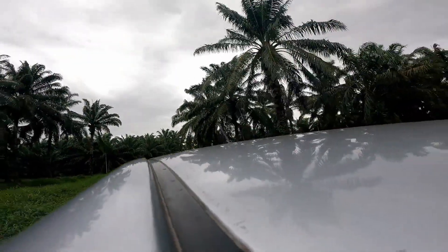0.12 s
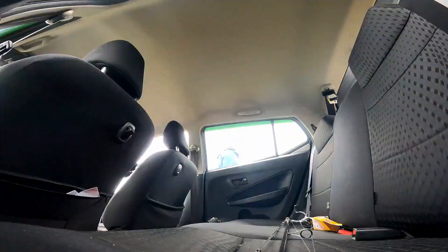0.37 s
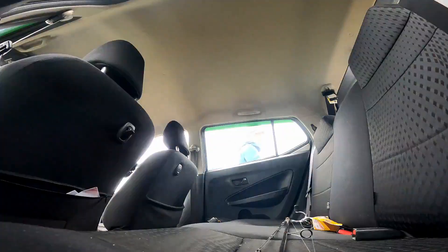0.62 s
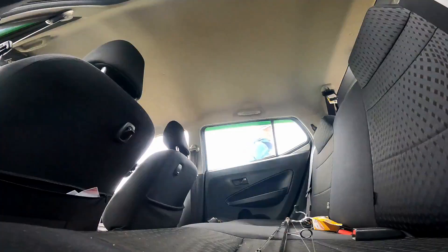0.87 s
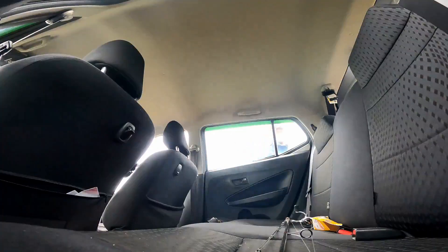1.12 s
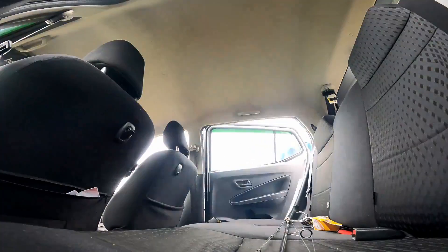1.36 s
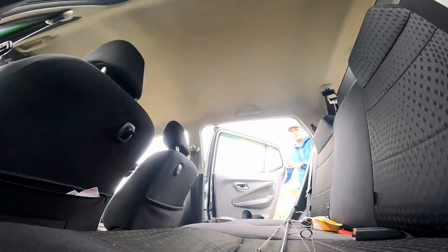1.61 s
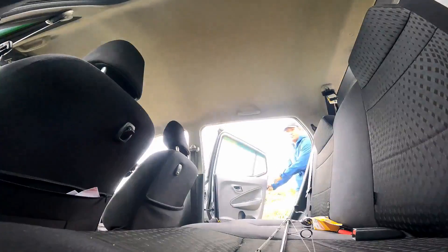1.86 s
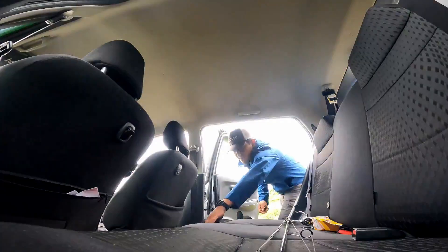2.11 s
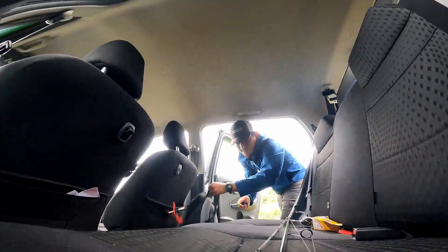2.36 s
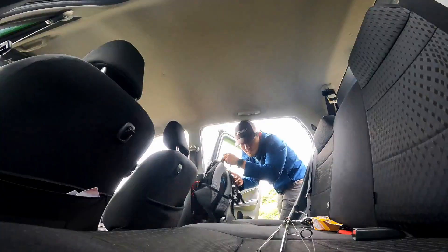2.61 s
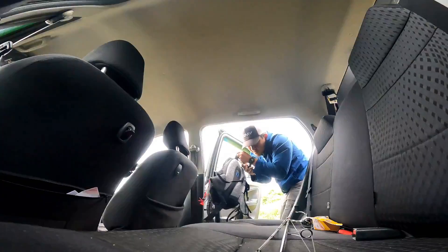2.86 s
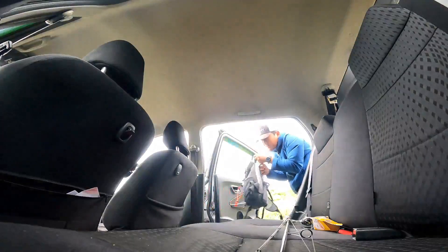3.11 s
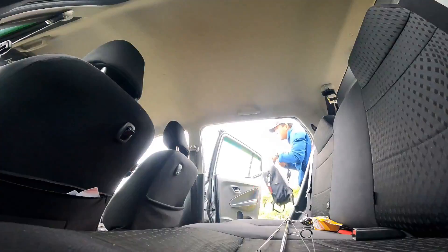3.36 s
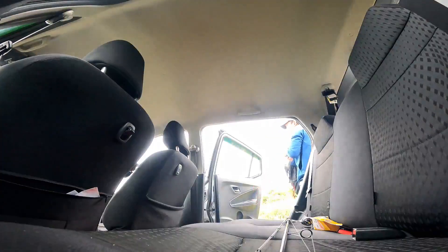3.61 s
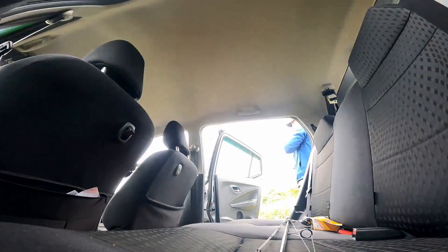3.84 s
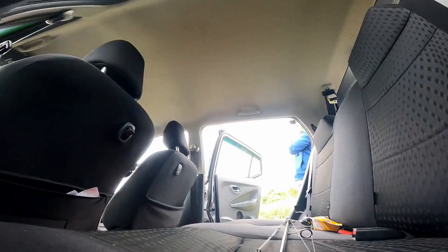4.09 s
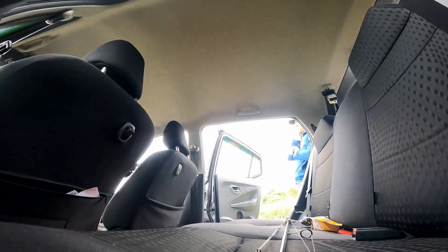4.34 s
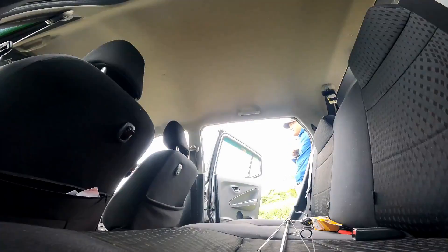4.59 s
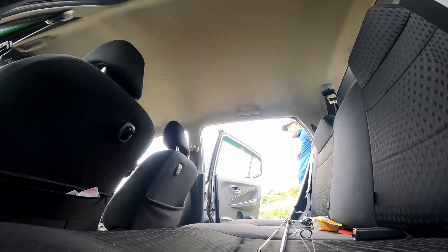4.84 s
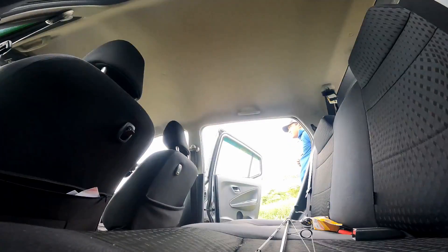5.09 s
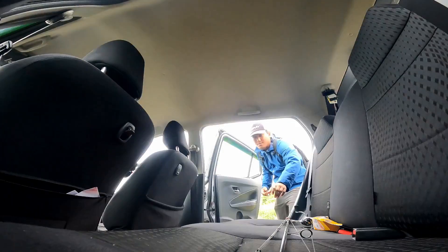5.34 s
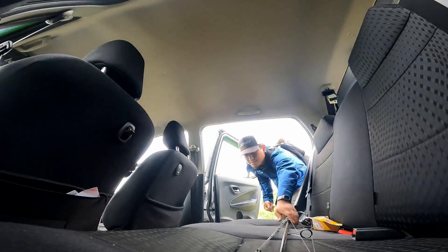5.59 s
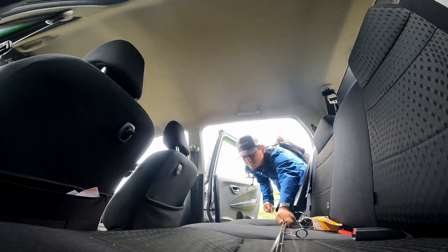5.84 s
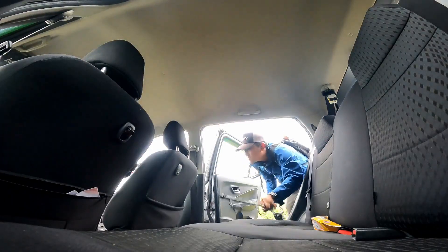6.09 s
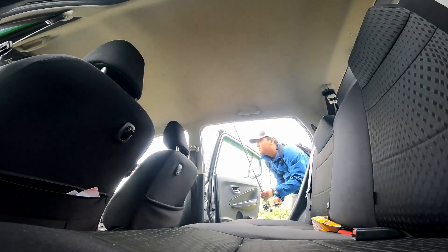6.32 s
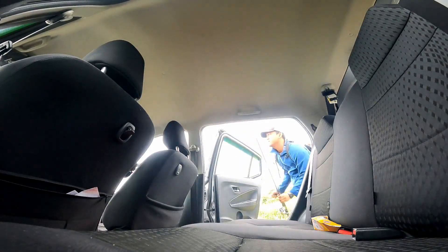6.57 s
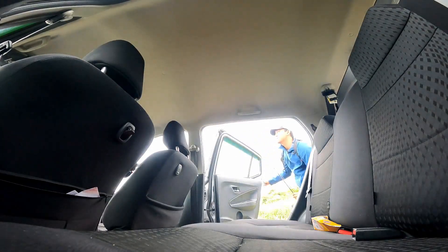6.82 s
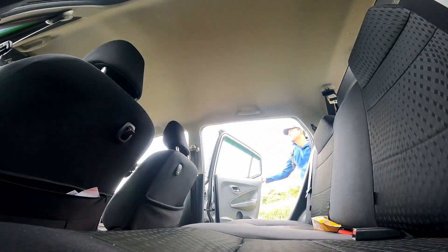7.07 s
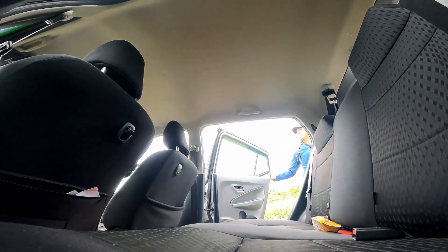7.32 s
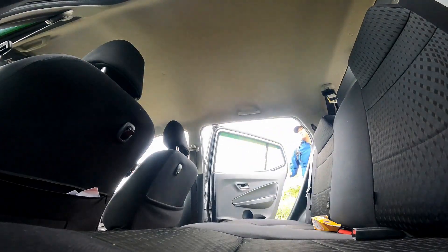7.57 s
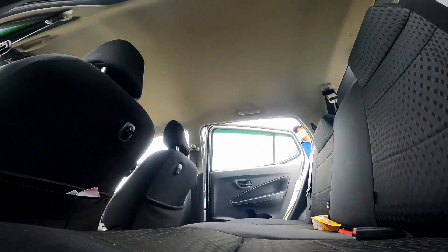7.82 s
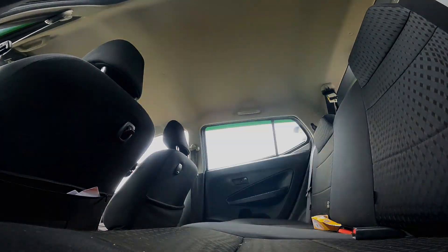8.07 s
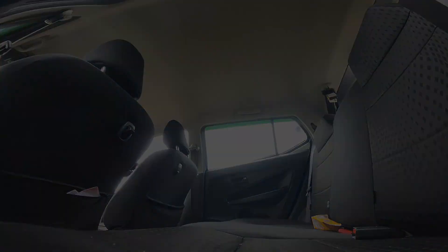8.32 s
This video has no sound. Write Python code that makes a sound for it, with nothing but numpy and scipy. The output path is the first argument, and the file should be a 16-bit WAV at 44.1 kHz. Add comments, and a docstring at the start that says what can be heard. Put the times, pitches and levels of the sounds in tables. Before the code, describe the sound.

Low wind on a microphone outdoors, then a click and the close, dry cabin of a parked car. Latch clunk and deep body thud, the panels drumming; bumps and fabric swishes as a bag comes out; softer rustling, tiny metallic jingles and buckle scrapes; sharp ticks of a fishing rod; faint high insect whine; finally a heavy door slam close to the end.

```python
"""Wind buffets a microphone on a car roof; after a cut it lies on the back seat.
The door is unlatched and swung open, a backpack is dragged out and shouldered with jingling zip pulls,
a rod is drawn out ticking on the trim and the door is slammed. Insects buzz outside.
Knocks are noise bursts that ring the car body, bumps and zip pulls are dying tones,
and wind, cloth, drumming panels and insects are shaped noise."""
import sys
import numpy as np
from scipy import signal
from scipy.fft import rfft, irfft, next_fast_len
from scipy.io import wavfile

SR = 44100
rng = np.random.default_rng(int(sys.argv[2]) if len(sys.argv) > 2 else 0)


def ratio(d):
    """dB to gain"""
    e = np.asarray(d, float) / 20
    return 10 ** e


def waveform_to_disk(signal):
    """Save audio, clipped to [-1, 1], as 16-bit WAV at the path in sys.argv[1]."""
    frames = np.transpose(np.atleast_2d(signal))
    scaled = np.clip(frames, -1, 1) * 32767
    samples = np.round(scaled).astype(np.int16)
    wavfile.write(sys.argv[1], SR, samples)


N = 372282   # length in samples
CUT_S = .3542   # roof before, back seat after
SEAT_HZ, SEAT_T60_S = 78, 0.18   # the cushion under the microphone


def in_time(rows):
    """Joins the points of each column by straight lines, one value a sample."""
    s, *columns = np.transpose(rows)
    return [np.interp(np.arange(N) / SR, s, c) for c in columns]


def at_hz(points, hz):
    """Reads a spectrum on a log frequency axis."""
    return np.interp(np.log(hz), np.log(np.array(points)[:, 0]), np.array(points)[:, 1])


def rms_one(x):
    """Scales a sound to rms 1."""
    return x / np.sqrt(np.mean(x ** 2) + 1e-20)


def drift(rate):
    """Slow random wandering of rms 1; a higher rate wanders faster."""
    r = np.exp(-80 * np.pi * rate / SR)
    noise = rng.standard_normal(N // 40 + 2002)
    slow = signal.lfilter([1], [1, -2 * r, r * r], noise)[2000:]
    # one slow value every 40 samples
    return np.interp(np.arange(N) / 40, np.arange(len(slow)), rms_one(slow))


def band(x, low_hz, high_hz):
    """Keeps the part of a sound between two frequencies."""
    sos = signal.butter(2, [low_hz, min(high_hz, .45 * SR)], "band", fs=SR, output="sos")
    return signal.sosfilt(sos, x + 1e-18)


def ring(clicks, hz, t60):
    """A resonance: a unit click sets a sine of height 1 ringing, 60 dB down after t60 seconds."""
    r, w = ratio(-60 / (t60 * SR)), 2 * np.pi * hz / SR
    return signal.lfilter([0, np.sin(w)], [1, -2 * r * np.cos(w), r * r], clicks + 1e-18)


# how alike left and right are: f/Hz, likeness (0 to 1)
LIKENESS = [(60, 1), (180, 0.95), (550, 0.73), (1650, 0.49), (4970, 0.79), (15000, 0.68)]


def texture(spectrum, patchy_db, grain_db, length=N):
    """Stereo noise of uneven grains, coloured by a spectrum, with a shared flicker; rms 1."""
    hz = np.maximum(np.arange(length // 2 + 1) * SR / length, 1)
    alike = np.clip(at_hz(LIKENESS, hz), 0, .99)
    grains = rng.standard_normal((2, length)) * ratio(grain_db * rng.exponential(1, length))
    mid, side = rfft(grains) * ratio(at_hz(spectrum, hz))
    pair = irfft(np.sqrt(1 + alike) * mid + np.sqrt(1 - alike) * side * [[1], [-1]], length)
    flicker_db = patchy_db * (drift(7.3) + drift(22.0))
    return rms_one(pair * ratio(flicker_db)[:length])


def bursts(times, levels_db, t60s, rise_s, snap):
    """Noise that rises fast and dies away, with one snap 2 ms in; one row of sound per column of levels."""
    t = np.arange(SR // 4) / SR
    out = np.zeros((np.shape(levels_db)[1], N + len(t)))
    for s, row_db, t60 in zip(times, levels_db, t60s):
        start = round(s * SR)
        shape = (1 - np.exp(-t / rise_s)) * ratio(-60 * t / max(t60, .005))
        click = np.arange(len(t)) == SR // 500
        contact = shape * rng.standard_normal(len(t)) + snap * click
        out[:, start:start + len(t)] += ratio(row_db)[:, None] * contact
    return out[:, :N]


def swells(rows, extra_db, slower, rest_db):
    """Level in dB: each row rises to its peak and falls away, powers added over a resting level."""
    t = np.arange(0, N, 40) / SR
    s, db, rise, fall = np.array(rows)[:, :4].T[:, :, None]
    late = (t - s) / slower   # scales both rise and fall: above 1 lengthens, below 1 shortens
    before, after = -late / np.maximum(rise, .01), late / np.maximum(fall, .01)
    fade_db = 20 * np.where(late < 0, before, after)
    power = np.sum(ratio(db + np.reshape(extra_db, (-1, 1)) - fade_db) ** 2, axis=0)
    return 10 * np.log10(np.interp(np.arange(N) / SR, t, power) + ratio(rest_db) ** 2)


# knocks of latch, door, bag and rod: t/s, strength level/dB, added weight level/dB,
# added hardness level/dB, contact t60/s
KNOCKS = [(0.584, -47, 4.5, -3.5, 0.085), (0.84, -23.5, -2, -19.5, 0.22), (1.272, -24.5, 1.5, -5.5, 0.32),
          (1.293, -11.5, -2, -15, 0.17), (1.322, -16.5, -8, -9, 0.11), (1.364, -25.5, -2.5, -1.5, 0.061),
          (1.387, -29, -2, -4, 0.11), (1.436, -40.5, 10.5, -4, 0.12), (1.587, -28.5, 0.5, -8.5, 0.18),
          (1.788, -46, 19, -11.5, 0.22), (2.223, -36, 12, -1.5, 0.038), (2.287, -29, 17, -15, 0.02),
          (2.337, -34, -8, -4.5, 0.91), (2.44, -14.5, -4, -8.5, 0.11), (2.501, -24.5, -16, -6, 0.085),
          (2.538, -22.5, -5, -7.5, 0.096), (2.631, -18.5, -4.5, 1, 0.041), (2.704, -30.5, -13, -4, 0.13),
          (2.764, -30.5, -30, 4.5, 0.12), (2.81, -16, -8.5, -5, 0.067), (3.053, -33, -13, -4, 0.087),
          (3.715, -27.5, -33, -4.5, 0.075), (3.754, -31.5, -27, 5.5, 0.069), (4.511, -41, -7, -2, 0.066),
          (4.634, -36.5, -2, -3, 0.29), (5.554, -33, -9, -4.5, 0.13), (5.753, -36.5, 7, -9, 0.33),
          (5.84, -28, -20, -5.5, 0.054), (5.874, -25, -16.5, -6, 0.044), (6.05, -33, -1, -16, 0.1),
          (7.066, -34.5, -7.5, 4.5, 0.16), (7.1, -32.5, -12, 5, 0.14), (7.534, -36.5, 2.5, 5, 0.094),
          (8.217, -9, -11, -8, 0.072), (8.234, -8, -1, -3.5, 0.16), (8.278, -14.5, 3, -9.5, 0.15),
          (8.318, -22.5, -5, -10.5, 0.31)]
# resonances of the car body: f/Hz, relative level/dB, t60/s
CAR_BODY = [(147.2, 2.5, 0.23), (231.9, -5, 0.28), (292.7, -5.5, 0.24), (350, 6, 0.039), (516, 10, 0.017),
            (625, 3.5, 0.019), (1014, 1, 0.026), (1367, -6.5, 0.097)]
# gear is handled on the seat between these two times: t/s
GEAR_S = (2.0, 7.0)


def knocks():
    """A rattling contact shakes the car body; the slow-building boom also rings the seat under moved gear."""
    s, db, weight_db, hard_db, t60s = np.transpose(KNOCKS)
    t = np.arange(N) / SR
    # columns: thud, boom, body, crack
    levels_db = db[:, None] + np.transpose([0 * db, weight_db, hard_db, hard_db - 1.5])
    rise_s = np.array([[.003], [.006], [.004], [.004]])
    snap = np.array([[9.0], [18.0], [6.0], [1.2]])
    thud, boom, body, crack = bursts(s, levels_db, t60s, rise_s, snap)
    on_seat = (t > GEAR_S[0]) & (t < GEAR_S[1])
    boom = 4.03 * band(boom, 83.0, 229)
    # the door side is a little louder
    thud = band(band(thud, 300, 1030), 202, 1210) * ratio([[1.5], [-1.5]])
    shake = boom * np.where(on_seat, .4, 1) + 2.14 * thud + 2.18 * band(body, 1150, 2165)
    modes = sum(ratio(mode_db) * ring(shake, hz, t60) for hz, mode_db, t60 in CAR_BODY)
    modes += ratio(9.5) * ring(boom * on_seat, SEAT_HZ, SEAT_T60_S)
    dull_crack = signal.lfilter([.4], [1, -.6], band(crack, 1550, 5080))
    return shake + ratio(-42.5) * modes + dull_crack


# hollow bumps and pings of door panel, bag, rod and trim:
# t/s, level/dB (before a 5 dB lift), f/Hz, t60/s
BUMPS = [(.874, -21.5, 143.8, .2), (.92, -22, 145, 0.24), (1.299, -33.5, 2640, 0.03),
         (1.353, -12, 104.6, 0.19), (1.595, -18, 145.6, 0.13), (1.992, -44.5, 3430, 0.012),
         (2.134, -42.5, 1850, 0.015), (2.417, -21, 435, 0.034), (2.465, -17.5, 450, 0.027),
         (2.655, -29, 85.2, 0.32), (2.826, -25, 432, 0.078), (3.096, -34, 280, 0.054),
         (3.7535, -24.5, 1220, 0.018), (3.761, -32.5, 477, 0.042), (4.445, -37.5, 453, 0.031),
         (4.508, -27, 233, 0.039), (5.014, -44, 520, 0.082), (5.682, -38.5, 1500, .02),
         (5.786, -34.5, 1250, 0.021), (5.807, -34.5, 1330, 0.022), (5.888, -30.5, 1240, 0.017),
         (5.955, -37, 330, 0.071), (6.014, -38.5, 340, 0.12), (7.174, -35.5, 276, 0.089),
         (7.705, -24.5, 195, 0.063), (7.729, -26, 197, 0.073), (8.218, -15.5, 642, 0.076),
         (8.268, -19, 127, .12), (8.316, -16, 350, 0.048)]


def bumps():
    """A soft contact rings one hollow mode and a weaker neighbour at a random pitch below it."""
    out = np.zeros(N + SR)
    t = np.arange(SR // 2) / SR
    for (s, db, hz, t60), (below, turn) in zip(BUMPS, rng.random((len(BUMPS), 2))):
        start = round(s * SR)
        neighbour_hz = hz * (0.44 + 0.355 * below)
        tone = np.sin(2 * np.pi * hz * t) + 0.42 * np.sin(2 * np.pi * (neighbour_hz * t + turn))
        build = 1 - np.exp(-t * hz * 2.07)   # nearly full after two cycles
        out[start:start + len(t)] += tone * build * ratio(db + 5.0 - 60 * t / max(t60, .01))
    return out[:N]


# the car is leant on and moved: t/s at the peak, drumming level/dB, rise/s and fall/s over 20 dB
# (lengthened for rocking, shortened for drumming), rocking level/dB above drumming
LEANS = [(.91, -31.5, 0.22, 0.36, 0), (1.33, -12, 0.08, 0.0663, -4.5), (1.65, -36, 0.65, 0.44, 4.5),
         (2.289, -28, 0.13, 0.32, -2.5), (2.55, -25.5, 0.49, .5, -5), (3.3, -45.5, 1.9, 2.2, -2),
         (4.45, -48, 0.7, 1, 5), (5.0, -47, 0.55, 1.6, -13), (5.83, -36, 0.23, 0.84, -4.5),
         (6.83, -51.5, 1, .02, 9.5), (7.24, -44.5, 0.5, 6, 2), (7.76, -36, 0.22, 0.5, -0.5)]


def car_levels():
    """Rocking and drumming dB; the whole body answers more slowly than its panels."""
    rest_db = -59
    rocking_db = swells(LEANS, np.array(LEANS)[:, 4], 1.17, rest_db)
    drumming_db = swells(LEANS, 0, 0.77, rest_db)
    return rocking_db, drumming_db


# strokes of cloth and door seal: t/s at the peak, swish level/dB, rise/s and fall/s over 20 dB
# (both slightly shortened when played; below .01 counts as .01), drag level/dB above swish
STROKES = [(.85, -72.5, 0.05, -0.27, 28.5), (1.312, -34.5, 0.02, -0.04, -3.5),
           (1.601, -54, 0.3, -0.02, 0.5), (2.028, -55.5, 0.37, 4, -9), (2.371, -42.5, 0.11, .5, 1.5),
           (2.456, -39.5, 0.15, 0.43, 6), (3.06, -49, 0.43, 0.52, -2), (3.276, -54.5, 0, 0.1, -3),
           (3.53, -49, 0.2, 0, 0.5), (3.98, -47.5, 0.5, 0.25, -1.5), (4.3, -55.5, 3.7, 0.65, 7.5),
           (4.47, -53.5, -0.5, -0.38, 3.5), (4.658, -49, -0.13, 0.2, -3), (5.0, -52, 1.9, 0.1, -1),
           (5.36, -58, -0.07, 3.5, 0.5), (5.6, -49.5, 0.3, 0.77, -5.5), (5.86, -57, 0.6, 0.4, 8),
           (6.43, -59, -0.2, 1, 5.5), (6.7, -51, 0.5, 0.25, -8.5), (7.06, -55, 1.3, 0, -14),
           (7.55, -59.5, 1.7, 0.8, 1), (8.216, -58.5, 0.03, -0.2, 19)]
# the door is open between these two times: t/s
DOOR_OPEN_S = (1.3, 8.22)


def cloth_levels():
    """Drag and swish dB; a faint rustle stays between strokes, nearly the same with the door open or shut."""
    t = np.arange(N) / SR
    is_open = (t > DOOR_OPEN_S[0]) & (t < DOOR_OPEN_S[1])
    rest_db = np.where(is_open, -70, -70.5)
    drag_db = swells(STROKES, np.array(STROKES)[:, 4], 0.85, rest_db)
    swish_db = swells(STROKES, 0, 0.93, rest_db)
    return drag_db, swish_db


# noise colours of the rocking body, drumming panels, dragged cloth, swish and hiss:
# f/Hz, relative level/dB (per Hz)
ROCKING = [(15, -12), (40, 5), (86, -30), (100, -19.5), (130, -46), (220, -120)]
DRUMMING = [(32, -7.5), (55, 3.5), (86, 7), (189, 0), (437, -13.5), (565, -21), (618, -52), (800, -61),
            (1040, -103)]
DRAG = [(410, -15.5), (700, -28.5), (1070, -9.5), (1320, -11), (1800, -11.5), (2300, -18.5), (2990, -19),
        (5060, -120)]
SWISH = [(1180, -31.5), (2000, -7.5), (2220, -15.5), (3280, -6.5), (5500, -11), (7150, -16.5),
         (12100, -120)]
HISS = [(2940, -7.5), (5000, -13), (7270, 2), (8620, -5), (12000, -10.5), (15500, -26.5)]


def handling():
    """The body rocks, seat and panels drum, cloth drags, swishes and hisses: five coloured noises."""
    rocking_db, drumming_db = car_levels()
    drag_db, swish_db = cloth_levels()
    low = ratio(rocking_db) * texture(ROCKING, patchy_db=1.2, grain_db=0)
    drum = texture(DRUMMING, patchy_db=1.4, grain_db=2.0)
    seat = ratio(-53.0) * ring(drum, SEAT_HZ, SEAT_T60_S)
    low += ratio(drumming_db) * rms_one(drum + seat)
    cloth = ratio(drag_db) * texture(DRAG, patchy_db=2.4, grain_db=3.0)
    cloth += ratio(swish_db) * texture(SWISH, patchy_db=1.9, grain_db=2.5)
    hiss = ratio(swish_db - 9.0) * texture(HISS, patchy_db=2.0, grain_db=2.0)
    return low + cloth + hiss


# ticks of buckles and rod rings: t/s, level/dB (before filtering), f/Hz, t60/s
TICKS = [(.803, -39, 3060, 0.073), (0.889, -43, 5730, 0.056), (3.601, -30.5, 3820, 0.15),
         (3.8999, -30, 3100, 0.027), (4.737, -31, 9100, 0.046), (4.9116, -40, 6600, 0.08),
         (4.972, -31, 7640, 0.02), (5.966, -16.5, 2300, 0.042), (6.0655, -33, 2860, 0.039),
         (6.167, -28, 2060, 0.035), (6.238, -34.5, 5500, 0.02), (6.302, -28.5, 3600, 0.071),
         (7.534, -24.5, 3520, 0.03)]


def ticks():
    """Short bright bursts, broad, with a hump at their own pitch; the two sides differ a little."""
    out = np.zeros((2, N + SR))
    t = np.arange(SR // 10) / SR
    for s, db, hz, t60 in TICKS:
        start = round(s * SR)
        mid, side = rng.standard_normal((2, len(t)))
        shape = (1 - np.exp(-t / 0.0026)) * ratio(db - 60 * t / max(t60, .004))
        burst = (mid + 0.29 * side * [[1], [-1]]) * shape
        broad = 0.61 * band(burst, 1900, max(7100, 2 * hz))
        hump = 0.9 * band(burst, hz / 1.15, hz * 1.12)
        out[:, start:start + len(t)] += broad + hump
    return out[:, :N]


# touches of the zip pulls: t/s, relative level/dB, added level/dB of the modes above 10 kHz
JINGLE = [(3.5558, -39, -41), (3.5833, -41, -23), (3.6184, -40.5, -8), (3.6406, -34, -21),
          (3.6571, -35, -20), (3.69, -34, -28), (3.7204, -34.5, -33), (4.2812, -43, -29),
          (4.5313, -36.5, -27), (4.579, -40, -25), (4.5924, -44, -13), (4.672, -33, -24),
          (4.7187, -34.5, -31), (4.8025, -35.5, -25), (4.8284, -42, -36), (4.977, -38, -26),
          (5.0205, -35, -28), (5.2335, -43, -17)]
# modes of a zip pull: f/Hz, relative level/dB, t60/s
ZIP_PULL = [(5750, -12, .03), (6900, -1, .04), (7060, 1, .035), (7330, -2, .04), (7850, 0, .03),
            (9230, -12, .1), (11100, -12, .03), (13300, 10, .07), (15350, 7, .06)]


def jingle():
    """Each touch and its two bounces are a short chatter that strikes every mode with random strength."""
    s, db, high_db = np.repeat(JINGLE, 3, axis=0).T
    bounce = np.arange(len(s)) % 3
    out = np.zeros(N)
    s = s + bounce * .012 * rng.uniform(0.47, 1.3, len(s))   # uneven gaps
    chance_db = rng.normal(0, 4.5, (len(s), len(ZIP_PULL)))
    touch_db = db - 5.0 * bounce   # each bounce is 5 dB weaker
    is_high = np.array(ZIP_PULL)[:, 0] > 1e4
    levels_db = touch_db[:, None] + is_high * high_db[:, None] + chance_db
    chatter = bursts(s, levels_db, np.full(len(s), .02), rise_s=0.002, snap=0)
    for touch, (hz, mode_db, t60) in zip(chatter, ZIP_PULL):
        out += ratio(mode_db - 23.5) * ring(touch, hz, t60)
    return out + 0.34 * band(chatter[1], 5500, 10000)


# straps sliding through buckles: t/s at the peak, level/dB, rise/s and fall/s over 20 dB
# (both very slightly shortened when played; below .01 counts as .01), resonance f/Hz
STRAPS = [(4.0, -40.5, 0.18, 0.15, 2950), (4.12, -39.5, -0.33, -0.1, 1780),
          (4.381, -48.5, -0.14, -0.05, 1100)]


def straps():
    """Friction noise through one resonance a strap."""
    out = np.zeros(N)
    for row in STRAPS:
        level_db = swells([row], 0, 0.97, rest_db=-120)
        friction = band(rng.standard_normal(N), row[4] / 1.29, row[4] * 1.19)
        out += ratio(level_db) * rms_one(friction)
    return out


def rattle(level_db, per_s):
    """Buckles and rod rings touch at random; each touch rings a few cycles at one of eight pitches."""
    is_touch = rng.random(N) < per_s / SR
    sizes = ratio(2.0 * np.minimum(rng.exponential(1, N), 2)) * rng.choice([-1, 1], N) * is_touch
    pitches, dealt = np.geomspace(450, 2200, num=8), rng.integers(0, 8, N)
    rings = sum(ring(sizes * (dealt == k), hz, 26.0 / hz) for k, hz in enumerate(pitches))
    return ratio(level_db) * rms_one(rings)


# pushes on the cabin air as the door moves: t/s, level/dB, direction (+1 or -1)
PUSHES = [(1.271, -14, -1), (8.228, -14, -1), (8.249, -5, 1)]


def cabin_air():
    """The closed cabin is an air spring that rings very low."""
    clicks = np.zeros(N)
    for s, db, direction in PUSHES:
        clicks[round(s * SR)] = ratio(db) * np.sign(direction)
    return ring(clicks, hz=22.45, t60=1)


def cabin(x):
    """Echoes in the cabin: short feedback delays, other ones for each side."""
    t60_s = 0.091
    size = next_fast_len(N + SR)
    turn = np.exp(-2j * np.pi * np.arange(size // 2 + 1) / size)   # one sample of delay
    lags = (rng.uniform(0.0017, 0.016, (2, 6)) * SR).astype(int)
    echo = []
    for side in lags:
        loops = [(-1) ** k * turn ** d / (1 - ratio(-60 * d / SR / t60_s) * turn ** d)
                 for k, d in enumerate(side)]
        echo.append(sum(loops))
    return irfft(rfft(x, size) * echo, size)[:, :N] / np.sqrt(6)


# wind on the microphone: t/s, level/dB
GUST = [(0.0, -20.5), (.25, -21), (.35, -15)]
# colour of the wind: f/Hz, relative level/dB (per Hz)
WIND = [(12, -56.5), (20, 1), (58, -3), (211, -17.5), (242, -25.5), (1330, -35), (1840, -45.5),
        (8790, -67.5), (11200, -84.5)]
# short bright flaps in the wind: t/s, level/dB (before filtering)
FLAPS = [(.1545, -16.5), (.309, -15), (.321, -28)]


def wind():
    """Lumpy turbulence with a few flaps, the same in both channels, until the cut."""
    length = round(CUT_S * SR)
    s, db = np.transpose(FLAPS)
    flaps = bursts(s, db[:, None], np.full(len(s), .06), rise_s=0.00076, snap=6.4)[0]
    out = band(band(flaps, 450, 1450), 300, 2000)
    turbulence = texture(WIND, patchy_db=2.0, grain_db=2.0, length=length)[0]
    out[:length] += ratio(in_time(GUST)[0][:length]) * turbulence
    # the signal slides to a steady offset in the last few ms, so the cut clicks
    slide = np.exp(np.minimum(np.arange(N) - length, 0) / (.003 * SR))
    return (out * (1 - slide) + ratio(-14) * slide) * (np.arange(N) < length)


# loudness of the insects: t/s, level/dB (before a 9 dB drop)
INSECTS = [(.37, -66), (1.6, -69), (2.5, -63), (4.5, -55), (7.1, -57.5), (8.15, -62.5)]
# the two singers: f/Hz, half width f/Hz, relative level/dB
INSECT_SONG = [(6960, 130, 0.0), (7270, 90, -1.0)]


def insects():
    """Two singers: narrow noise that swells and fades unevenly."""
    song = np.zeros((2, N))
    for hz, half_width, db in INSECT_SONG:
        swell = ratio(db + 3 * drift(14))
        song += swell * band(rng.standard_normal((2, N)), hz - half_width, hz + half_width)
    shared = song.mean(axis=0)   # makes the two sides more alike
    return ratio(in_time(INSECTS)[0] - 9.0) * rms_one(song + 1.3 * shared)


def scene():
    """Roof first, then the back seat; the rattle follows the cloth drag and fades as the drumming weakens."""
    shaking_db, drag_db = car_levels()[1], cloth_levels()[0]
    rattle_db = drag_db - 1.5 + np.minimum(shaking_db + 42.5, 0)
    hits = knocks() + bumps() + ticks() + jingle() + straps() + rattle(rattle_db, per_s=85.0)
    echoes = ratio(-10) * cabin(band(hits, 343, 21000))
    inside = hits + echoes + handling() + cabin_air() + insects()
    return wind() + inside * (np.arange(N) > CUT_S * SR)


def roll_off(x):
    """The treble ends steeply here."""
    return signal.sosfilt(signal.butter(12, 15820, fs=SR, output="sos"), x)


def record(dry):
    """Loud peaks are rounded off softly."""
    mix = 1.164 * np.tanh(dry / 1.096)
    return roll_off(mix)


dry = scene()
out = record(dry)
waveform_to_disk(out)
```